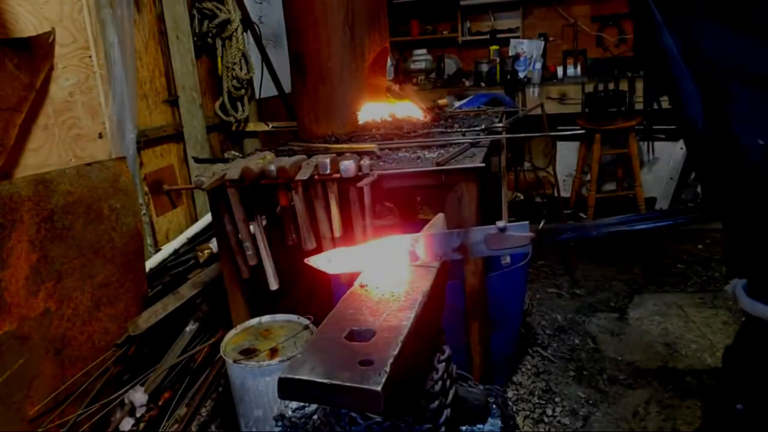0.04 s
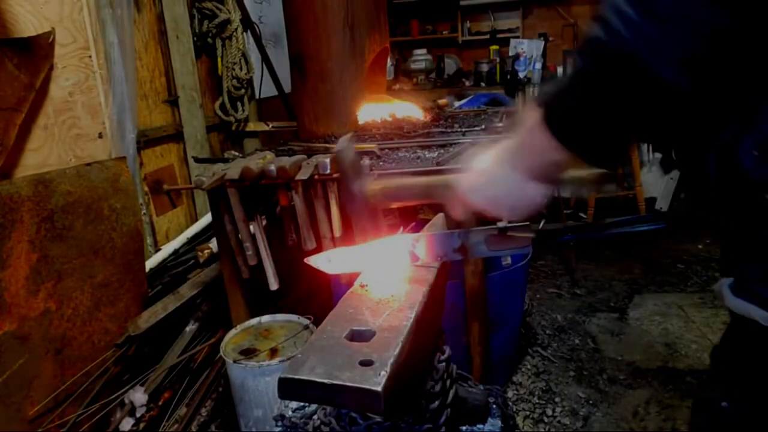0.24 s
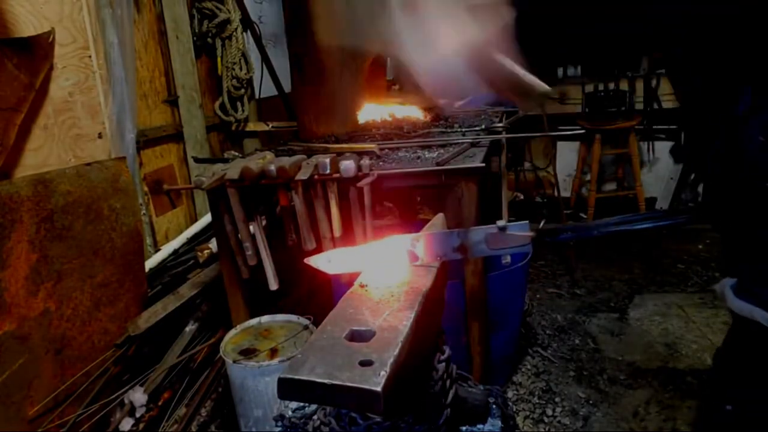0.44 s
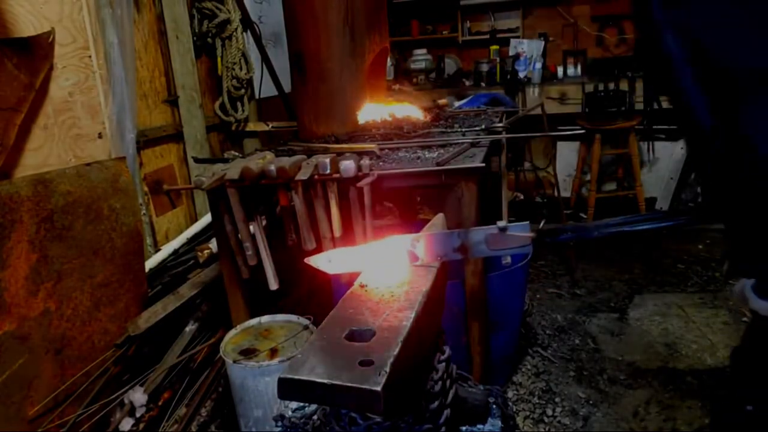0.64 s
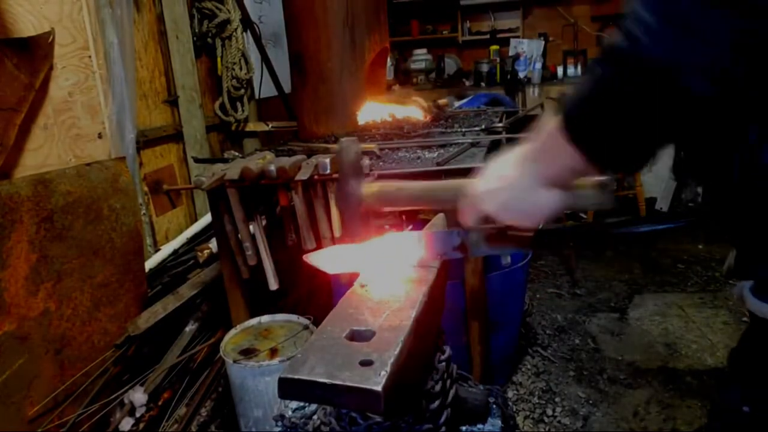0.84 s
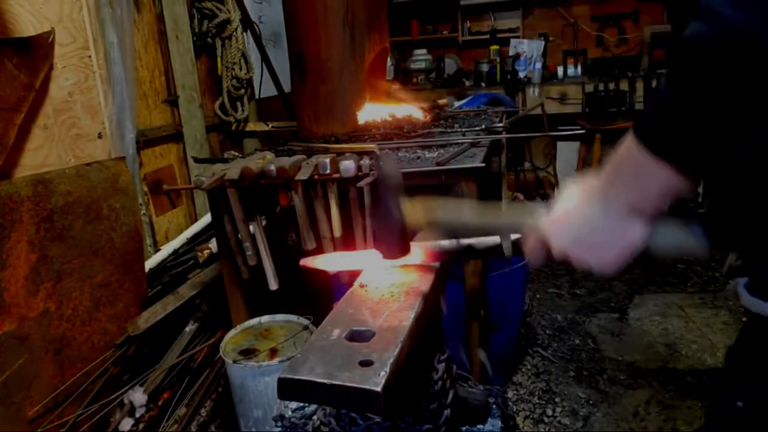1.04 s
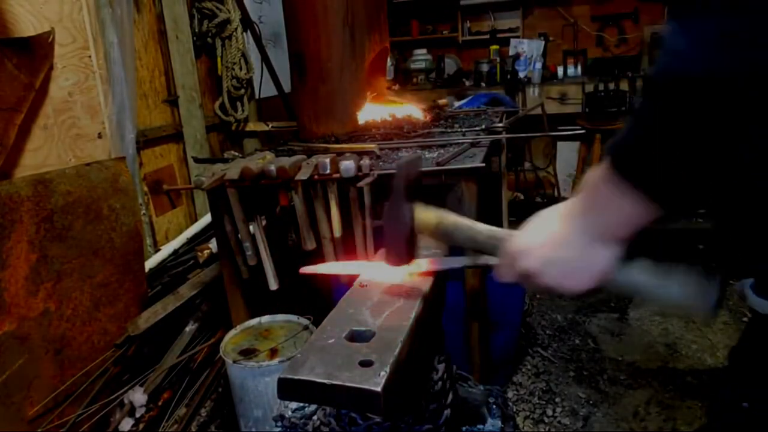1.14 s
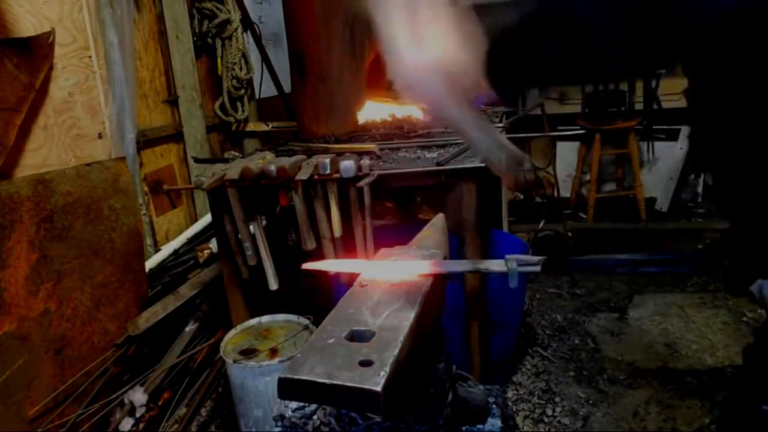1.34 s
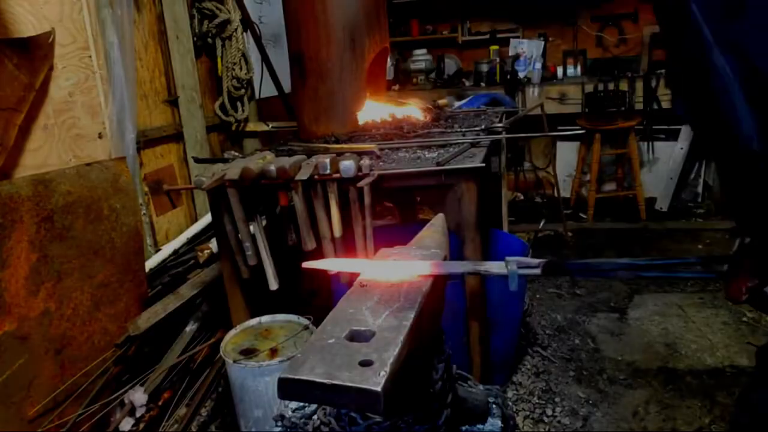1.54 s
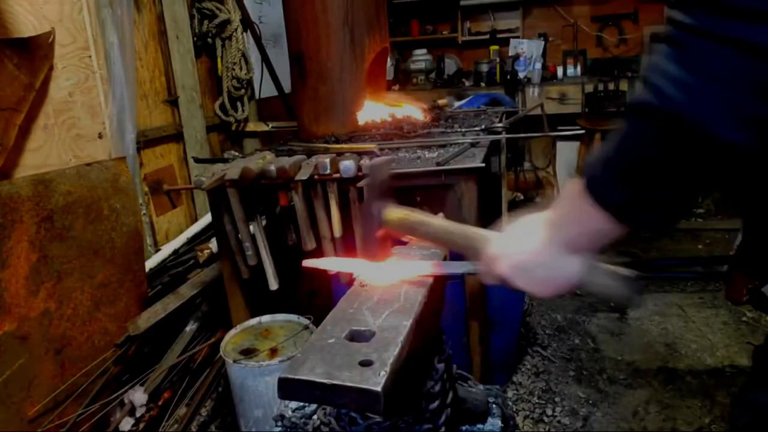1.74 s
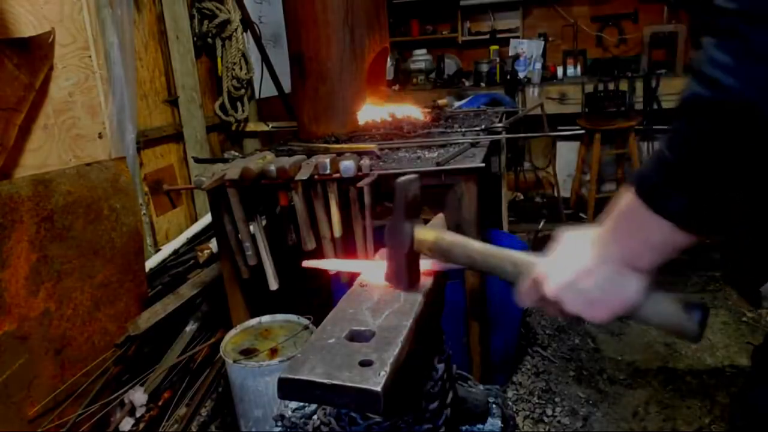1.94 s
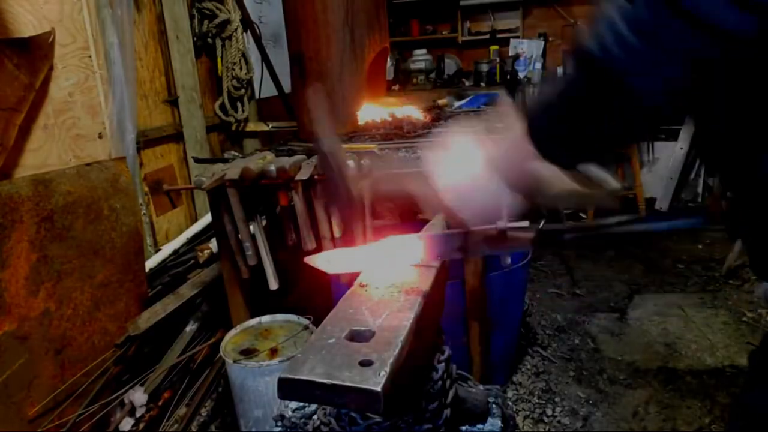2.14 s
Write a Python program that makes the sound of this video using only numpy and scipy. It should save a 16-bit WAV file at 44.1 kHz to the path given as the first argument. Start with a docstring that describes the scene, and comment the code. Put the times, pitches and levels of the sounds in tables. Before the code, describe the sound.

A hammer strikes hot steel on an anvil. Heavy, dull thumps with sharp cracks land at about 0.2 and 0.8 seconds, the second with more anvil ring. A lighter, brighter tap rings at 1.1. A softer-edged heavy blow falls at 1.7, then the workpiece rattles and clanks five times from 1.8 to 2.1. Short workshop reverberation, faint unsteady forge rumble, close mono microphone, slightly rounded peaks.

```python
"""Three heavy, dull hammer blows land on hot steel on an anvil in a small workshop, with one ringing tap among them.
After the last blow the workpiece rattles on the anvil five times, and a forge rumbles low behind.
A thump is a sum of fading tones from the stand and the room, plus noise, dulled by the contact time.
Cracks and clatter are fading noise; hammer, anvil, tongs and workpiece ring as fading tones.
The forge is coloured noise whose level wanders."""
import sys
import numpy as np
from scipy import signal
from scipy.fft import rfft, irfft, next_fast_len
from scipy.io import wavfile
from scipy.ndimage import map_coordinates

SR = 44100
rng = np.random.default_rng(int(sys.argv[2]) if len(sys.argv) > 2 else 0)


def to_wav(s):
    """Save 16-bit WAV."""
    ch = np.atleast_2d(s).T  # columns
    pcm = np.round(np.clip(ch, -1, 1) * 32767)  # PCM
    wavfile.write(sys.argv[1], SR, pcm.astype(np.int16))


def makeup_ratio(level_db):
    """Linear amplitude ratio for a level in decibels (20 dB per factor of ten)."""
    decades = np.asarray(level_db, float) / 20
    return 10 ** decades


N = 97020
STRIKE_LENGTH = SR // 2 + SR // 4  # samples of one strike
STRIKE_T = np.arange(STRIKE_LENGTH) / SR  # seconds since the strike

# Colour of a hard steel crack, also used for bright ticks: f/Hz, relative level per Hz/dB
CRACK_COLOUR = [(600, -12), (1500, -2.5), (2100, 0), (3000, -3), (5200, -6), (6500, -3.5), (7200, -9.5),
                (7900, -15), (8600, 0.5), (9200, 0), (10300, -1.5), (11500, -1), (12500, -5), (15600, -8)]
# Tones of the hammer head: f/Hz, relative level/dB, t60/s (time to fade by 60 dB, before steel() fades it faster)
HAMMER_TONES = [(1095, -7, .12), (1196, -10, .08), (2055, -8, .12), (2241, -13, .1), (2636, -13, .13),
                (3415, -12, .13), (3812, -11, .1), (4600, -12, .08), (4830, -10, .09), (5012, -13, .08),
                (6584, 1, .125), (8650, -19, .17), (9460, -13, .12), (10760, -22, .1)]
FLAT = [(100, 0)]  # the same level at every pitch: f/Hz, level/dB


def strikes():
    """Every strike thumps the same stand and room and rings the steel parts anew."""
    body = stand_and_room()
    out = np.zeros(N + STRIKE_LENGTH)
    for start_s, sound in blows(body) + tap(body) + rattles(body):
        out[round(start_s * SR):][:STRIKE_LENGTH] += sound
    return out[:N]


def blows(body):
    """Heavy blows on hot steel: a strong thump with a crack, the harder the contact the shorter it lasts."""
    # One row per blow: t/s, thump/dB, contact/ms, crack/dB, anvil face ring/dB, anvil waist ring/dB,
    # hammer ring/dB, tongs ring/dB
    blow_rows = [(0.2228, -18.5, 0.51, -20, -40, -58.5, -40, -68),
                 (0.8377, -18, 0.34, -21, -30.5, -28.5, -55, -49),
                 (1.7186, -20.5, 0.83, -21, -36, -34.5, -79, -38.5)]
    return [(row[0], hammer_strike(body, row, CRACK_COLOUR, snap_db=20)) for row in blow_rows]


def tap(body):
    """A lighter hammer tap on the bare anvil, with more ring and less thump."""
    # t/s, thump/dB, contact/ms, clatter/dB, anvil face ring/dB, anvil waist ring/dB, hammer ring/dB, tongs ring/dB
    tap_row = (1.1046, -33, 1.15, -22.5, -40.5, -59.5, -17, -34.5)
    # Colour of the clatter: f/Hz, relative level per Hz/dB
    clatter_colour = [(300, -5.5), (1000, -5.5), (2200, -3.5), (4500, -5.5), (6000, -10), (7800, -23),
                      (9000, -14.5), (12000, -28.5), (13500, -22.5), (15500, -28)]
    return [(tap_row[0], hammer_strike(body, tap_row, clatter_colour, snap_db=16))]


def hammer_strike(body, row, colour, snap_db):
    """One strike pushes the stand, makes a sharp noise, and sets anvil, hammer and tongs ringing."""
    # Tones of anvil face, anvil waist and tongs: f/Hz, relative level/dB, t60/s (before steel() fades them faster)
    face_tones = [(3424, -2, .07), (4118, -6, .08), (5780, 0, .16), (6420, -8, .14), (8660, -7, .12),
                  (10065, 0, .35), (10780, -5, .08), (11490, -10, .18)]
    waist_tones = [(2008, 0, .3)]
    tongs_tones = [(1893, 0, .35)]
    # Colour difference of the direct crack from the room's answer: f/Hz, change/dB
    direct_tilt = [(1000, -1.5), (7000, -4.5), (10000, 14), (15500, -3)]
    _, thump_db, contact_ms, noise_db, face_db, waist_db, hammer_db, tongs_db = row
    thump = makeup_ratio(thump_db) * pushed(body, contact_ms)
    noise = makeup_ratio(noise_db) * snap(colour, snap_db, direct_tilt)
    anvil = steel(face_tones, face_db) + steel(waist_tones, waist_db)
    return thump + noise + anvil + steel(HAMMER_TONES, hammer_db) + steel(tongs_tones, tongs_db)


def rattles(body):
    """The workpiece rattles on the anvil: small thumps, clatter, ticks and rings."""
    # One row per rattle: t/s, thump/dB, clatter/dB, bright tick/dB, hammer ring/dB, short clank/dB, long ring/dB
    rattle_rows = [(1.793, -68, -43.5, -45, -72, -80, -80), (1.8356, -48, -63, -42, -80, -62, -83),
                   (1.8816, -44, -32.5, -57, -53, -22.5, -38),
                   (1.931, -39.5, -42.5, -58.5, -52, -22.5, -30.5),
                   (2.0793, -50.5, -54, -68.5, -75.5, -51, -75.5)]
    # Colour of the clatter: f/Hz, relative level per Hz/dB
    rattle_colour = [(300, 4), (1000, 8), (2400, 6), (4300, -4), (5200, -10), (7800, -20.5), (9000, -9),
                     (12000, -44), (15500, -34)]
    # Tones of the short clank and of the long workpiece ring: f/Hz, relative level/dB, t60/s (before steel())
    clank_tones = [(1187, 0, 0.036), (1630, -3, 0.01), (2204, 2.5, 0.017), (2654, -19, 0.045),
                   (3440, -14.5, 0.063), (3845, -6, 0.023), (4370, -10.5, 0.015)]
    piece_tones = [(495, -10, .2), (1104, 0, .24), (2250, -14, .2), (8655, -24, .12)]
    sounds = []
    for start_s, thump_db, clatter_db, tick_db, hammer_db, clank_db, piece_db in rattle_rows:
        thump = makeup_ratio(thump_db) * pushed(body, contact_ms=0.9)
        clatter = makeup_ratio(clatter_db) * snap(rattle_colour, 22, FLAT)
        tick = makeup_ratio(tick_db) * burst(CRACK_COLOUR, rise_s=0.0025)
        rings = steel(HAMMER_TONES, hammer_db) + steel(clank_tones, clank_db) + steel(piece_tones, piece_db)
        sounds.append((start_s, thump + clatter + tick + rings))
    return sounds


def stand_and_room():
    """The thump: stand and room air swing as fading tones, with noise for the many modes too dense to list."""
    # Tones of the stand, of its first flex and of the room air: f/Hz, relative level/dB, t60/s
    stand_tones = [(294, 1, .25), (353, -7, .25), (397, -1, .22), (418, -1, .22), (438, -4, .22),
                   (472, -8, .25), (521, -4, .23), (574, -11, .25), (685, -10, .25), (722, -12, .25),
                   (790, -7, .25), (821, -4, .25), (903, -5, .25), (987, -12, .22), (1052, -2, .2),
                   (1125, -9, .2)]
    flex_tones = [(290, 11, .025), (190, 0, .05)]
    air_tones = [(56, -7, .7), (69.5, -6, .7), (85, -13, .5), (103, -5, .55), (145, -8, .4), (168, -8, .35),
                 (187, -5, .35), (213, -7, .3), (246, -8, .3)]
    # Colour of the thump noise: f/Hz, relative level per Hz/dB
    thump_colour = [(90, -43.5), (150, -18.5), (300, 1.5), (1100, 5), (1350, -4), (2500, -15.5),
                    (5000, -44.5)]
    lag_s = 0.0019  # stand and air start this much after the strike
    stand = ring(stand_tones, 0.002, 0, lag_s)
    flex = ring(flex_tones, 0.0005, 0, 0.0017)
    air = ring(air_tones, 0.01, 0, lag_s)
    noise = makeup_ratio(2.5) * burst(thump_colour, rise_s=0.00073)
    return stand + flex + air + noise


def pushed(body, contact_ms):
    """The body's answer to a half-sine push: a longer contact is duller."""
    t_ms = np.arange(200) / SR * 1000
    push = np.sin(np.pi * np.clip(t_ms / contact_ms, 0, 1))
    return signal.fftconvolve(body, push / push.sum())[:STRIKE_LENGTH]


def steel(modes, db):
    """A steel part rings, roughened by the workshop's answer, and dies away ever faster."""
    direct = ring(modes, rise_s=0.00034, scatter_db=1.5)
    tail = burst(FLAT, rise_s=0.009)
    answer = signal.fftconvolve(direct, tail / np.linalg.norm(tail))[:STRIKE_LENGTH]
    extra_loss_db = 20 * (STRIKE_T / 0.24) ** 3  # 20 dB more lost by 0.24 s
    return makeup_ratio(db - extra_loss_db) * (direct + makeup_ratio(-6) * answer)


def ring(modes, rise_s, scatter_db, lag_s=0):
    """A struck body sounds as a sum of fading sines of alternating sign, with a soft start."""
    t = np.clip(STRIKE_T - lag_s, 0, None)
    hz, db, t60 = np.transpose(modes)[:, :, None]
    scattered_db = db + scatter_db * rng.standard_normal(db.shape)
    sign = (-1) ** np.arange(len(hz))[:, None]
    tones = makeup_ratio(scattered_db - 60 * t / t60) * sign * np.sin(2 * np.pi * hz * t)
    return tones.sum(axis=0) * (1 - np.exp(-t / rise_s))


def snap(points, db, tilt):
    """A sharp direct crack, db over the room's answer before it rises and fades, plus that answer."""
    tilted = [(hz, level + along(tilt, hz)) for hz, level in points]
    fade = makeup_ratio(db - 60 * STRIKE_T / 0.004)  # 60 dB lost in 4 ms
    rise = 1 - np.exp(-STRIKE_T / 0.0008)
    direct = coloured(tilted, STRIKE_LENGTH) * fade * rise
    return direct + burst(points, rise_s=0.001)


def burst(points, rise_s):
    """Noise that dies band by band as the workshop does, with a weak slower tail."""
    # How fast the workshop's sound dies, apart from the slower tail: f/Hz, t60/s
    workshop_fading = [(50, 1), (130, .67), (350, .27), (920, .28), (2430, .27), (6400, .24), (10000, .2),
                       (15000, .18)]
    late_db, late_t60_s = -51.5, 0.99
    hz, t, bands = signal.stft(coloured(points, STRIKE_LENGTH), SR, nperseg=256)
    early = makeup_ratio(-60 * t / along(workshop_fading, hz)[:, None])
    late = makeup_ratio(late_db - 60 * t / late_t60_s)
    noise = signal.istft(bands * (early + late), SR, nperseg=256)[1][:STRIKE_LENGTH]
    return noise * (1 - np.exp(-STRIKE_T / rise_s))


def coloured(points, n):
    """Noise of rms 1 whose spectrum follows the (f/Hz, level/dB) points."""
    m = next_fast_len(n + 8192)
    white = rfft(rng.standard_normal(m))
    colour = makeup_ratio(along(points, np.fft.rfftfreq(m, 1 / SR)))
    return unit(irfft(white * colour, m)[:n])


def along(points, hz):
    """Reads a value between (f/Hz, value) points, on a log pitch axis."""
    f, v = np.transpose(points)
    return np.interp(np.log(hz + 1), np.log(f + 1), v)


def unit(x):
    """Scales a sound to rms 1."""
    return x / np.sqrt(np.mean(x ** 2) + 1e-20)


def forge():
    """Low unsteady rumble of the fire with faint hiss: coloured noise with a wandering level."""
    # Colour of the fire: f/Hz, relative level per Hz/dB
    fire_colour = [(20, -47.5), (35, -7.5), (59, -5.5), (100, -1.5), (120, -14), (141, 2), (170, -18),
                   (249, -5), (270, -16), (309, -10.5), (405, -24.5), (700, -35.5), (1610, -55.5),
                   (4000, -60), (8000, -63.5), (11300, -56.5), (13000, -63), (16000, -51)]
    wobble = map_coordinates(rng.standard_normal(30), [np.arange(N) * 8 / SR])  # 8 random points a second
    level_db = -48.5 - 2 * wobble
    return makeup_ratio(level_db) * coloured(fire_colour, N)


def scene():
    """Strikes over the forge, on one channel."""
    return (strikes() + forge())[None]


def top_cut(x):
    """Nothing passes above the cut-off."""
    return signal.sosfilt(signal.butter(12, 16820, fs=SR, output="sos"), x)


def record(dry):
    """Peaks round off in the preamp, then the highest and lowest pitches are cut."""
    clip_top, clip_hard = 0.56, 4  # highest level, sharpness of the bend
    soft = dry / (1 + np.abs(dry / clip_top) ** clip_hard) ** (1 / clip_hard)
    low_pass = signal.cheby2(12, 50, 16400, fs=SR, output="sos")  # 50 dB down from 16400 Hz
    mic_high_pass = signal.butter(3, 42, "high", fs=SR, output="sos")
    mix = signal.sosfilt(mic_high_pass, signal.sosfilt(low_pass, soft))
    return top_cut(mix)


dry = scene()
out = record(dry)
to_wav(out)
```